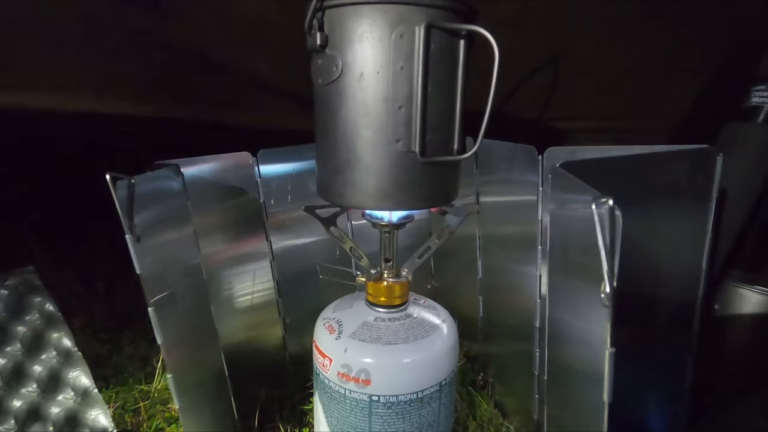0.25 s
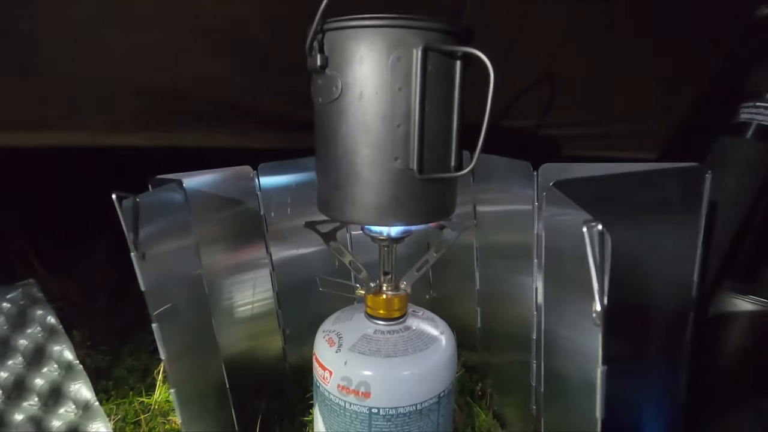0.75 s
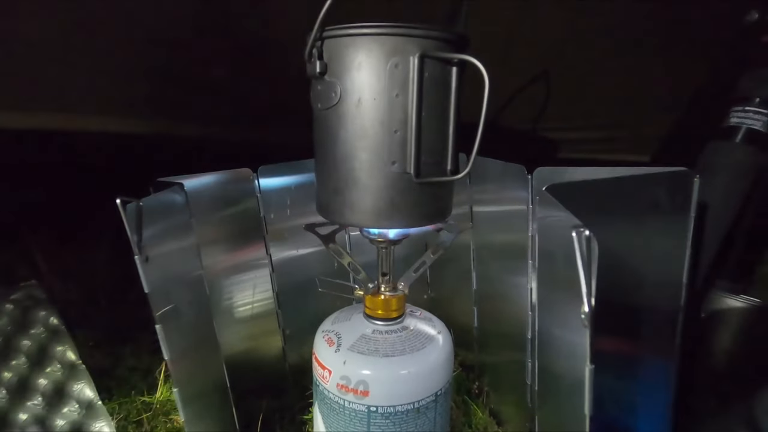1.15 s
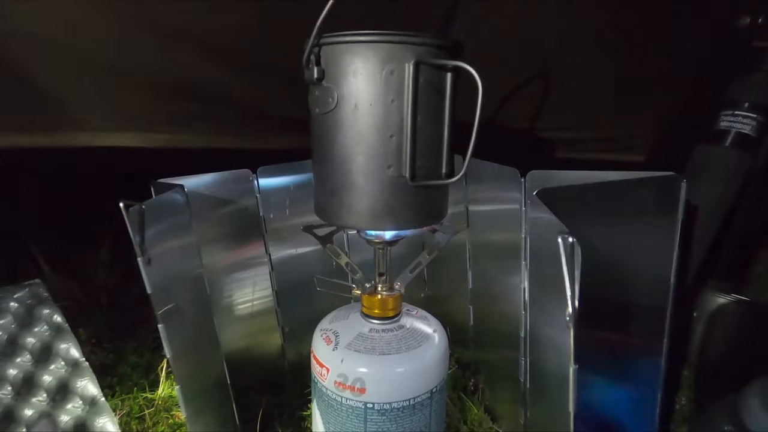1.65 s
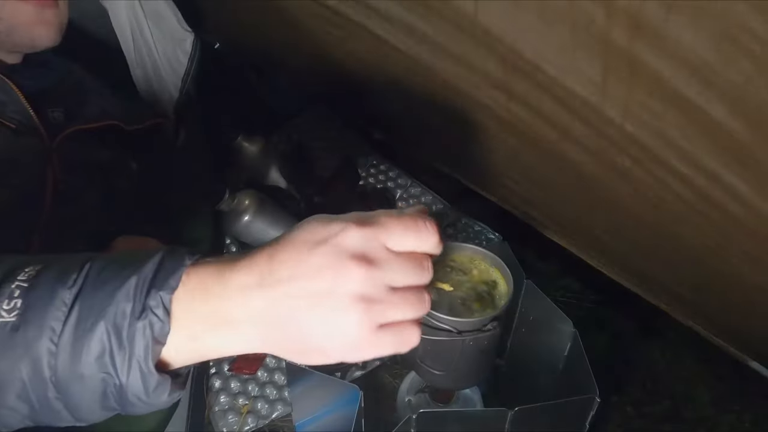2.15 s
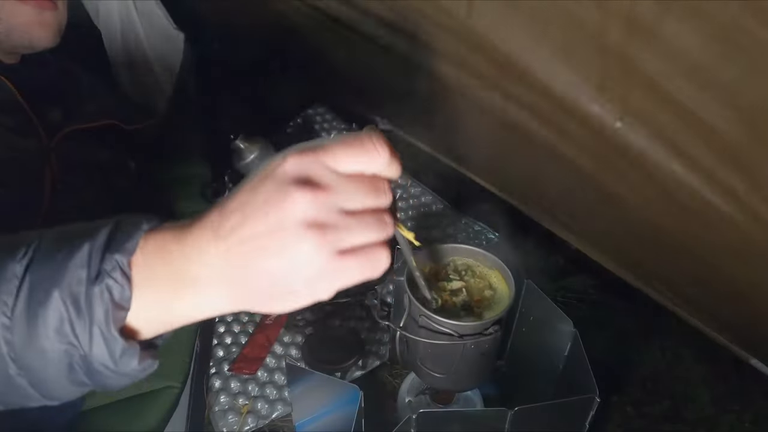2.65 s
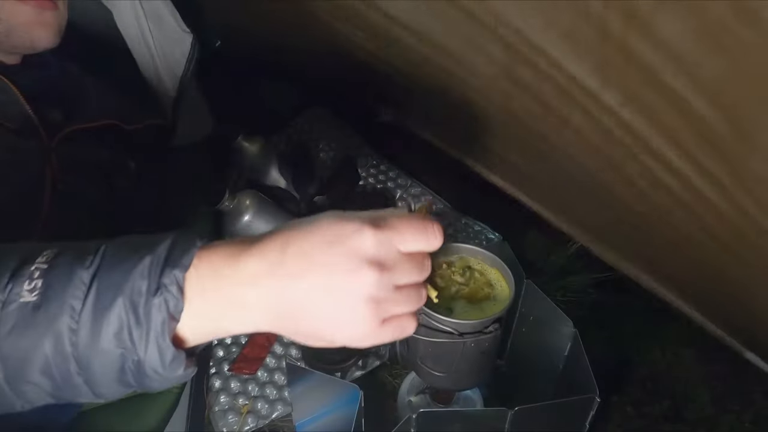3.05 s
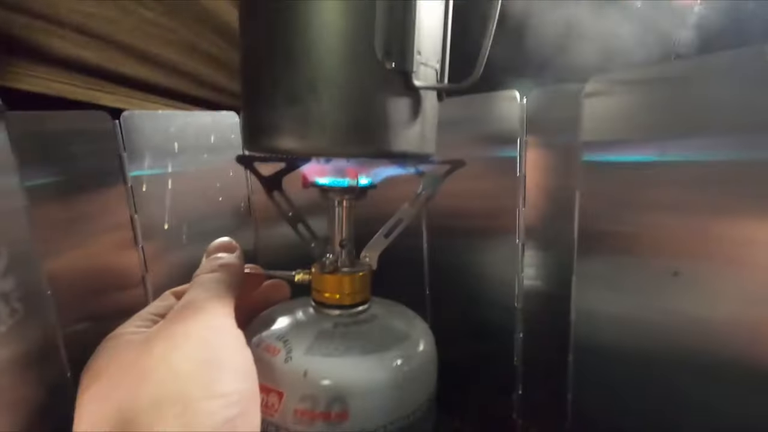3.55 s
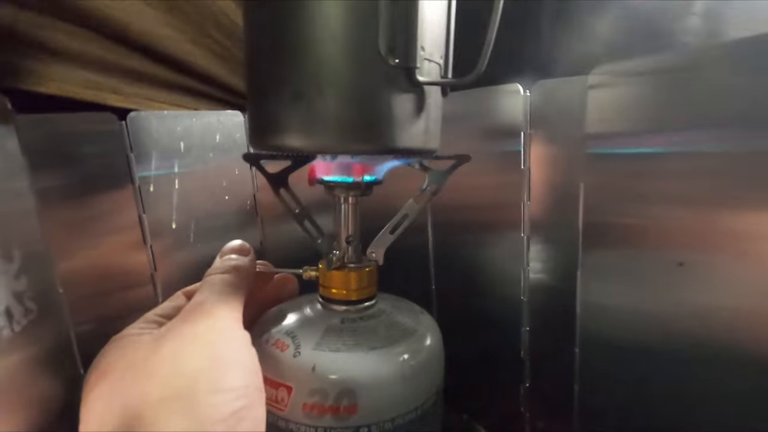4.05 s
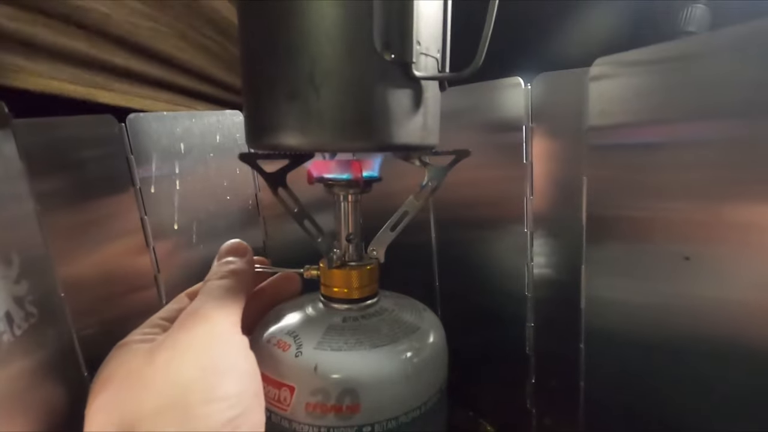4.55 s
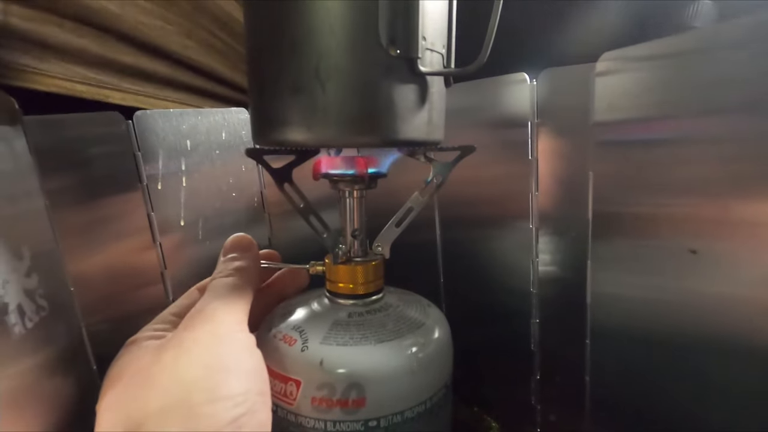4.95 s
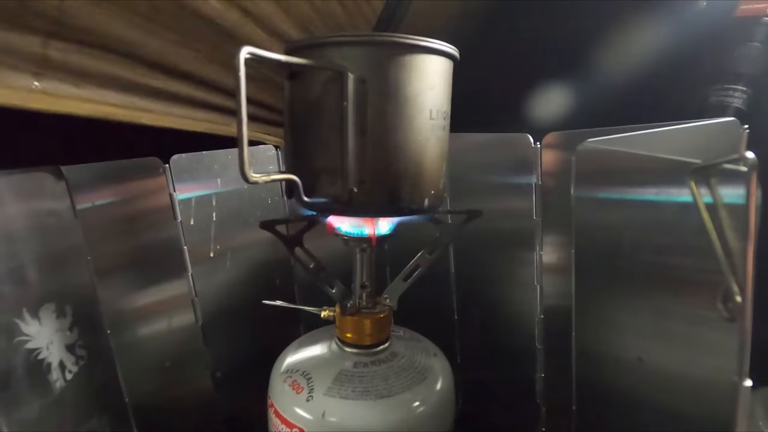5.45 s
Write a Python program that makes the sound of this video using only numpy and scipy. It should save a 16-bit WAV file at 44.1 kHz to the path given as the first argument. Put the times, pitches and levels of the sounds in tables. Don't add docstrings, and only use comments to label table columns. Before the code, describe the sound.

From 0 to 2.0 s a small canister stove burns close by: a steady breathy roar with a bright, airy jet hiss, fluttering lightly, its metallic colour sliding slightly as the microphone moves. At 2.0 s it cuts to above the pot: the flame is somewhat quieter and darker, with more low rumble and wavering hiss; a tiny high creak comes near 3.3 s. Two dull, deep thumps almost together at 3.41-3.43 s mark the next cut. Now close to the burner, the flame is softer and rounded stew bubbles plop rapidly. From 3.6 to 4.3 s the gas is turned down, the roar and thin whistle sinking away. Until 5.4 s, muffled irregular pops, fine spatter, dry foil ticks and faint valve nudges stand over a very low flame. At about 5.46 s a fuller flame roar returns abruptly, with a small sharp tick near 5.56 s, and continues to the end.

```python
import sys
import numpy as np
from scipy import signal
from scipy.fft import rfft, irfft, next_fast_len
from scipy.io import wavfile
from scipy.ndimage import uniform_filter1d, map_coordinates

SR = 44100
rng = np.random.default_rng(int(sys.argv[2]) if len(sys.argv) > 2 else 0)


def materialize(psi):
    bounded = np.clip(np.atleast_2d(psi).T, -1, 1)
    quanta = np.round(bounded * 32767).astype(np.int16)
    wavfile.write(sys.argv[1], SR, quanta)


def field_ratio(decibels):
    return 10 ** (np.asarray(decibels, dtype=float) / 20)


N = 250929

# start_s, end_s
PLACES_S = [
    (0, 2.020),
    (2.020, 3.486),
    (3.486, 5.457),
    (5.457, 5.69),
]
# rumble_db, roar_db, rush_db, jet_under_pot_db, jet_off_foil_db, fizz_db
LEVELS_DB = [
    (-40, -28.5, -32.5, -44.5, -43, -48),
    (-34, -33, -37.5, -47.5, -51.5, -54),
    (-46.5, -38, -52, -69, -75, -70.5),
    (-39.5, -34.5, -43.5, -66, -68, -58),
]
# freq_hz, density_db_per_hz
FLAME_BESIDE = [(11, -47), (18, -9), (37, -18), (81, -1.5), (119, -0.5), (164, -2), (348, -10.5),
                (482, -11), (579, -18.5), (695, -14), (868, -18.5), (1110, -15.5), (1730, -12), (1960, -22),
                (2300, -23.5), (2990, -60), (5060, -120)]
FLAME_ABOVE = [(11, -30), (18, 4), (32, 4), (60, -3), (161, -7), (348, -23), (463, -16.5), (654, -11.5),
               (817, -18), (923, -25), (1200, -21.5), (1530, -36), (1800, -35.5), (2300, -36), (2990, -64),
               (5060, -120)]
FLAME_LOW = [(11, -32), (18, -11.5), (60, -5), (178, 4.5), (300, -3.5), (454, -11.5), (579, -37),
             (723, -11.5), (834, -18), (1110, -17), (1700, -23.5), (2300, -38), (2990, -71), (5060, -120)]
FLAME_REOPENED = [(11, -30), (18, 6), (86, -5.5), (146, -7.5), (348, -10.5), (579, -18), (738, -15.5),
                  (1040, -30.5), (1360, -25), (2300, -38), (2990, -67), (5060, -120)]
# freq_hz, density_db_per_hz
JET_BESIDE = [(1240, -34), (2100, -9), (2360, -5.5), (2620, 0.5), (2940, 0), (3290, 0.5), (4390, -7),
              (4720, -8), (5210, -10.5), (5800, -9), (6340, -15), (8590, -17), (12000, -28.5), (14900, -41)]
JET_ABOVE = [(1240, -39), (2100, 2.5), (2390, -7), (2710, 3), (3060, -0.5), (3210, -4), (3600, -2.5),
             (4350, -10), (4720, -9.5), (5300, -11), (5750, -13), (5990, -14), (8590, -23.5), (12800, -35),
             (14900, -44)]
JET_LOW = [(1240, -30), (2100, -2), (2260, -13), (2770, -11), (3600, -12.5), (4530, -10.5), (5890, -11),
           (6880, -18), (7590, -13), (14900, -37.5)]
JET_REOPENED = [(1240, -30), (2100, -5), (2410, -3), (2600, -3), (3580, -6), (4180, -4), (5210, -10),
                (5840, -2.5), (7720, -17), (9090, -13), (9550, -17), (12900, -23), (14900, -36)]
# freq_hz, width_hz, lift_db
RESONANCES = [
    [(720, 400, 2.5), (1787, 100, 3.5), (2697, 130, 4.5), (2980, 60, -12.5), (3270, 82, 3.5), (4130, 69, 1),
     (4740, 90, 6.5), (5150, 70, 1), (5760, 95, 3), (6800, 97, 1), (7840, 100, -3), (8440, 62, -3),
     (11620, 60, 5), (12650, 90, 4)],
    [(635, 180, -1), (2668, 92, 6.5), (3380, 360, 4), (4600, 110, 7.5), (5660, 81, 8.5), (6500, 91, 5),
     (7740, 170, 2.5), (8500, 120, 7)],
    [(684, 52, 4), (2780, 300, 4.5), (7810, 310, 0)],
    [(5800, 350, 8.5), (9000, 300, 4)],
]
# freq_hz, likeness_0_to_1, left_minus_right_db, left_lag_us
PORTS = [
    [(40, 1, 2.5, 60), (300, 0.97, 0.5, 115), (700, 0.94, -1.5, 28), (1690, 1, 1.5, 42),
     (2270, 0.34, 6, 58), (2680, 0.82, 3, 35), (4000, 0.8, 2, 31), (5600, 0.5, 2.5, 16), (6600, 0, 0.5, 31),
     (9400, 0.4, -1, 22), (14000, 0.1, -.5, 84)],
    [(40, .985, 2.5, 60), (300, 0.97, 0.5, 105), (1190, 0.97, -2.4, 50), (1600, 0.7, 1.5, 43),
     (2700, 0.98, 1, 53), (3800, 0.8, 0, 31), (4900, 0.8, 4.1, 36), (6200, 0.4, -3, 39), (7600, 0.2, 3, 34),
     (9400, 0.3, -1, 30), (14000, 0.2, -1, 51)],
    [(40, 1, -0.13, 3), (1490, 1, -0.58, 1.5), (2500, 0.98, 1, 3), (3900, 0.95, 1.5, 3),
     (5800, 0.98, 0.5, 3), (7000, 0.9, .2, 2.7), (10600, 0.87, -.3, .1), (11700, .32, -2, 5)],
]
# time_s, pitch_hz
SWAY = [
    (0, 3310),
    (.3, 3296),
    (.55, 3200),
    (.8, 3276),
    (1.0, 3302),
    (1.25, 3190),
    (1.45, 3300),
    (1.65, 3530),
    (1.85, 3330),
    (2.02, 3310),
]
# centre_s, width_s, freq_hz, lift_db
SHADES = [(2.23, .05, 480, 6), (2.2, 0.11, 640, -3), (2, 0.094, 640, 10), (2.91, 0.1, 840, 14),
          (4.4, 0.092, 2800, -8), (2.72, 0.12, 2300, 3.5), (2.71, .09, 5000, 4), (2.1, 0.061, 4700, -1),
          (3.36, 0.21, 3200, 10), (3.24, 0.16, 4700, -3), (3.7, .15, 5100, 1.5), (2.53, 0.24, 5900, -4),
          (0.17, 0.063, 1800, 3.5), (1.04, 0.13, 2500, 2), (1.3, 0.07, 9200, -1), (1.7, 0.12, 2800, 2.5),
          (3.66, 0.083, 3000, 7), (3.8, .25, 12300, 7), (0.081, 0.18, 5300, 3), (1.34, 0.19, 4400, 1.5),
          (2.28, .1, 3900, 6), (3.35, .03, 1300, 3), (3.32, 0.15, 3200, -6), (2.46, .2, 3400, -2.5),
          (1.7, .06, 5500, 2), (1.75, 0.13, 140, 3)]
# centre_s, width_s, lift_db
DRAUGHT = [
    (3.409, 0.062, 4.5),
    (4.62, 0.14, -7.5),
]
# time_s, flow_db
GAS = [
    (3.495, 0.5),
    (3.72, -4.5),
    (3.9, -3.5),
    (4.04, -4.5),
    (4.1, -9.5),
    (4.27, -13),
    (4.8, -14),
    (5.45, -12.5),
]
FOLLOWS_GAS = (0.08, 1.66, 0.8, 0.76, 0.73, 0.7)
# start_s, peak_db, pitch_hz
CREAKS = [(3.278, -44, 5250), (3.6144, -65.5, 4470), (3.7324, -55, 5530), (3.7773, -67, 5840),
          (3.8434, -60, 6030), (3.8626, -55, 8580), (3.9637, -54, 5540), (3.9645, -58, 12000),
          (3.9804, -69, 4600), (4.0138, -62, 4520), (4.1754, -64, 5950), (4.2807, -64, 4500),
          (4.3031, -66, 5800), (4.3634, -63, 5260), (4.4418, -53, 5350), (4.4524, -63, 5300),
          (4.62, -55, 5900), (4.6274, -57, 5110), (4.7356, -63, 4910), (4.8554, -61, 5840),
          (4.8604, -60, 5020), (4.8854, -61, 5210), (4.8923, -60, 4490), (5.1033, -60, 5200),
          (5.1248, -60, 4670), (5.2614, -63, 4500), (5.2824, -57, 4780), (5.3497, -60, 4550),
          (5.4453, -54, 5660), (5.5563, -44.5, 5760)]
# start_s, peak_db, pitch_hz
TICKS = [(3.6151, -50, 2780), (3.7767, -55, 2930), (3.963, -71, 2600), (4.0067, -55, 2580),
         (4.0506, -67, 2720), (4.4417, -54, 2300), (4.6053, -64, 3020), (4.8064, -66, 2790),
         (4.8548, -53, 2510), (4.856, -63, 3500), (4.8856, -72, 9500), (5.1082, -56.5, 3080),
         (5.1281, -55, 2250), (5.2159, -65, 2790), (5.2608, -68, 4280), (5.4599, -64, 2370),
         (5.557, -46, 2950)]
# start_s, peak_db, pitch_hz
SPARKS = [(4.067, -62, 7810), (4.3534, -67, 7640), (4.4412, -70, 8220), (4.6193, -64, 8500),
          (4.8562, -70, 8300), (4.8852, -68, 9160), (5.1241, -62, 8000), (5.277, -68, 8000),
          (5.277, -76, 12500), (5.34, -70, 7500), (4.03, -68, 8000)]
# start_s, peak_db, pitch_hz
KNOCKS = [(3.412, -20, 47.5), (3.43, -18, 54.5), (4.204, -36.5, 44), (4.495, -37, 211), (4.765, -39, 269),
          (4.979, -44, 300), (5.112, -54, 290), (4.807, -33, 300), (4.876, -30.5, 264), (5.124, -34, 80),
          (5.271, -38.5, 89), (5.325, -34, 260)]
# time_s, level_db
BOIL = [
    (3.495, -45),
    (3.9, -48.5),
    (4.1, -49),
    (4.3, -61),
    (4.55, -59.5),
    (4.8, -53.5),
    (5.15, -54.5),
    (5.38, -73),
    (5.455, -36.5),
]
# start_s, peak_db, pitch_hz, snap_minus_peak_db
POPS = [(3.652, -26, 891, -24), (3.681, -23, 663, -28), (3.738, -34, 732, -15), (3.82, -30, 678, -23),
        (3.85, -31, 635, -22), (3.899, -27.5, 630, -23), (3.921, -27, 620, -6), (3.953, -31, 750, -13),
        (3.981, -38, 780, -15), (4.006, -30, 450, -7), (4.085, -36, 680, -16), (4.193, -31, 715, -11),
        (4.355, -48, 684, 6.5), (4.467, -35.5, 670, -7), (4.497, -36.5, 680, -14), (4.559, -42.5, 902, -1),
        (4.698, -38, 724, -16), (4.719, -40, 643, -11), (4.805, -37, 640, -27), (4.856, -30, 457, -5),
        (4.876, -32, 616, -25), (4.939, -38, 719, -3), (4.979, -31.5, 681, -25), (5.033, -36, 686, -9),
        (5.105, -32, 720, -16), (5.22, -34, 750, -10), (5.308, -36, 692, -20), (5.402, -36.5, 760, -7),
        (5.418, -35, 654, -7), (5.431, -34, 770, -14)]
# start_s, peak_db
SMALL_POPS = [(3.537, -48), (3.579, -33), (3.749, -47), (3.776, -32.5), (3.812, -34), (3.87, -37),
              (3.907, -30), (4.054, -60), (4.146, -40), (4.295, -36.5), (4.332, -38.5), (4.441, -56),
              (4.627, -40), (4.64, -39), (4.649, -40), (4.912, -53), (4.961, -33), (5.21, -53),
              (5.256, -48), (5.27, -46), (5.284, -44), (5.32, -35), (5.338, -40), (5.385, -44),
              (5.452, -34), (3.659, -35), (3.689, -34), (3.757, -37), (4.015, -40), (4.451, -47),
              (4.473, -44), (4.601, -42), (4.671, -48), (4.893, -44), (4.947, -42)]

SMALL_POP_HZ, SMALL_POP_SNAP_DB = 695, -11.5
POT_HZ, POT_T60_S, POT_DB = 725, 0.045, -21
WHISTLE_HZ, WHISTLE_WIDTH_HZ, WHISTLE_DB, WHISTLE_FOLLOWS_GAS = 5870, 470, -67.5, 1.9
SWAY_REST_HZ = 3270
SLIDE_SHARE = 0.022
SHADE_OCTAVES = 0.27
LEAN_DB_PER_S = -0.5


def read(table, hz, column=1):
    table = np.transpose(table)
    return np.interp(np.log(hz), np.log(table[0]), table[column])


def walk(rate_hz, size):
    hold = int(SR / rate_hz)
    steps = np.repeat(rng.standard_normal(N // 400)[:size // hold + 1], hold)
    return 1.2 * uniform_filter1d(uniform_filter1d(steps, hold), hold)[:size]


def add(out, at_s, sound):
    i = int(at_s * SR)
    out[i:i + len(sound)] += sound[:N - i]


def blip(hz, cycles):
    turns = np.arange(int(9 * cycles * SR / hz) + 8) * hz / SR
    ring = -np.sin(2 * np.pi * turns) * turns * np.exp(-turns / cycles)
    return ring / np.max(np.abs(ring))


def ports(hz, shared, apart, place):
    table = PORTS[min(place, 2)]
    like = np.clip(read(table, hz, column=1), 0, 1)
    left_db, lag_us = read(table, hz, column=2), read(table, hz, column=3)
    mid = shared * np.sqrt((1 + like) / 2)
    side = apart * np.sqrt((1 - like) / 2)
    tilt = field_ratio(left_db / 2) * np.exp(-1j * np.pi * hz * lag_us / 10 ** 6)
    return np.array([(mid + side) * tilt, (mid - side) / tilt])


def valve_db(t):
    return np.interp(t, *np.transpose(GAS))


def turbulence(t, place, colour, edges_hz, levels_db, step_octaves, gust_db, flicker_db, drift_db):
    size = levels_db.shape[1]
    hz = np.maximum(np.arange(size // 2 + 1) * SR / size, 1.)
    lift_db = sum(db / (1 + (2 * (hz - f) / w) ** 2) for f, w, db in RESONANCES[place])
    gain = field_ratio(read(colour, hz) + lift_db) * (hz > edges_hz[0]) * (hz < edges_hz[-1])
    eddies = ports(hz, *rfft(rng.standard_normal((2, size))), place) * gain

    power = np.abs(eddies.mean(axis=0)) ** 2 * 2 / size ** 2
    zones = list(zip(edges_hz[:-1], edges_hz[1:]))
    have_db = np.array([10 * np.log10(power[(hz > a) & (hz <= b)].sum()) for a, b in zones])
    middles = np.log2([np.sqrt(a * b) for a, b in zones])

    if place == 0:
        slip = np.cumsum(np.interp(t, *np.transpose(SWAY)) / SWAY_REST_HZ)
    else:
        slip = np.arange(size) + np.cumsum(SLIDE_SHARE * walk(2.5, size))
    slide_low_hz, slide_high_hz = (2900, 4000) if place == 0 else (3300, 5600)

    gust = walk(24.07, size) + 1.22 * walk(69.8, size)
    flicker = walk(8.4, size)
    octave, out = np.log2(hz), 0
    low, high = np.log2(edges_hz[0]), np.log2(edges_hz[-1])
    for centre in np.arange(low, high + step_octaves, step_octaves):
        share = np.clip(1 - np.abs(octave - centre) / step_octaves, 0, 1)
        zone_at = np.interp(centre, middles, np.arange(len(zones)))
        weights = np.clip(1 - np.abs(np.arange(len(zones)) - zone_at), 0, 1)
        flicker = 0.27 * flicker + 1.64 * walk(15.16, size)
        band_db = weights @ (levels_db - have_db[:, None]) + gust_db * gust + flicker_db * flicker
        band_db += drift_db * walk(3.25, size)
        for at_s, width_s, f, db in SHADES:
            away = centre - np.log2(f)
            if t[0] < at_s < t[-1] and abs(away) < 0.6:
                band_db += db * np.exp(-((t - at_s) / width_s) ** 2 - (away / SHADE_OCTAVES) ** 2)
        band = irfft(eddies * share, size)
        if place < 2 and slide_low_hz < 2 ** centre < slide_high_hz:
            band = np.array([map_coordinates(port, [slip], order=3, mode="wrap") for port in band])
        out = out + field_ratio(band_db) * band
    return out


def stove():
    flames = FLAME_BESIDE, FLAME_ABOVE, FLAME_LOW, FLAME_REOPENED
    jets = JET_BESIDE, JET_ABOVE, JET_LOW, JET_REOPENED
    flame_unrest = [(0.78, 0.48, 0.11), (0.5, 0.75, 0.3), (1.2, 0.9, 0.11), (0.89, 0.74, 0.1)]
    jet_unrest = [(0.5, 0.7, 0.7), (0.5, 0.6, 0.35), (0.5, 0.6, 0.6), (0.6, 0.6, 0.6)]
    flame_edges_hz, jet_edges_hz = (18, 70, 400, 2200), (2200, 3100, 4300, 15200)
    melt_samples = 160
    out = np.zeros((2, N))
    for place, levels_db in enumerate(LEVELS_DB):
        first, last = (min(int(s * SR), N) for s in PLACES_S[place])
        size = next_fast_len(last - first + 200, True) // 2 * 2
        t = np.arange(first, first + size) / SR
        db = np.array(levels_db)[:, None] + np.outer(FOLLOWS_GAS, valve_db(t) * (place == 2))
        if place == 1:
            db[4] += LEAN_DB_PER_S * (t - t.mean())
        for at_s, width_s, lift_db in DRAUGHT:
            db[0] += lift_db * np.exp(-((t - at_s) / width_s) ** 2)
        flame = turbulence(t, place, flames[place], flame_edges_hz, db[:3], 0.5, *flame_unrest[place])
        jet = turbulence(t, place, jets[place], jet_edges_hz, db[3:], 0.22, *jet_unrest[place])
        since = np.arange(size) / melt_samples
        until = (last - first) / melt_samples + 1 - since
        melt = np.clip(np.minimum(since + (place == 0), until), 0, 1)
        out[:, first:first + size] += ((flame + jet) * np.sin(melt * np.pi / 2))[:, :N - first]
    return out


def ticks(table, cycles, grit_db, grit_s):
    out, t = np.zeros(N), np.arange(500) / SR
    for (at_s, db, hz), grit in zip(table, rng.standard_normal((len(table), 500))):
        tail = np.convolve(grit * np.exp(-t / grit_s), blip(hz, cycles / 2))
        add(out, at_s, field_ratio(db) * blip(hz, cycles))
        add(out, at_s, field_ratio(db + grit_db) * tail)
    return out


def knocks():
    out = np.zeros(N)
    for at_s, db, hz in KNOCKS:
        add(out, at_s, field_ratio(db) * blip(hz, 0.37 if hz < 150 else 0.16))
    return out


def whistle():
    edges_hz = WHISTLE_HZ + np.array([-0.5, 0.5]) * WHISTLE_WIDTH_HZ
    band = signal.butter(2, edges_hz, "band", fs=SR, output="sos")
    gas = signal.sosfilt(band, rng.standard_normal(N))
    t = np.arange(N) / SR
    low_flame = (t > PLACES_S[2][0]) & (t < PLACES_S[2][1])
    level_db = WHISTLE_DB + WHISTLE_FOLLOWS_GAS * valve_db(t) + 1.1 * walk(29.6, N)
    return low_flame * gas / gas.std() * field_ratio(level_db)


def bubble_bursts(out):
    bursts = list(POPS) + [(s, db, SMALL_POP_HZ, SMALL_POP_SNAP_DB) for s, db in SMALL_POPS]
    for (at_s, db, hz, snap_db), chance in zip(bursts, rng.random((len(bursts), 7))):
        snap = blip(1150 + 500 * chance[1], 0.3 + 0.3 * chance[2])
        add(out, at_s, field_ratio(db - 7.5) * blip(hz, 0.14 + 0.5 * chance[0]))
        add(out, at_s, field_ratio(db - 9) * blip(284, 0.31))
        add(out, at_s, field_ratio(db + snap_db + 3.5) * snap)
        for late, pitch in chance[1:].reshape(3, 2):
            drop = blip(550 * 2.8 ** pitch, 0.44)
            add(out, at_s + 0.001 + 0.009 * late, field_ratio(db - 8.5 - 3.5 * late) * drop)


def bubble_patter(out, rate_hz=230, small_db=2, scatter_db=2.5):
    start_s, end_s = PLACES_S[2]
    curve, flurry = np.transpose(BOIL), walk(45, N)
    chance = rng.random((1200, 3))
    times_s = start_s - np.cumsum(np.log(chance[:, 0])) / rate_hz
    for at_s, pitch, size in zip(times_s, chance[:, 1], chance[:, 2]):
        if at_s < end_s:
            boil_db = np.interp(at_s, *curve) + 2.8 * flurry[int(at_s * SR)]
            db = small_db + boil_db + scatter_db * (-np.log(size) - 1)
            add(out, at_s, field_ratio(db) * blip(480 * 3.7 ** pitch, 0.4))


def simmer(stew_top_hz=1780):
    out = np.zeros(N)
    bubble_bursts(out)
    bubble_patter(out)
    t = np.arange(3000) / SR
    pot = np.sin(2 * np.pi * POT_HZ * t) * 1000. ** (-t / POT_T60_S) * 2 * np.pi * POT_HZ / SR
    out = out + field_ratio(POT_DB) * signal.fftconvolve(out, pot)[:N]
    return signal.sosfilt(signal.butter(6, stew_top_hz, fs=SR, output="sos"), out)


def scene():
    burner = stove()
    foil = ticks(CREAKS, 1.44, -11, 0.0023)
    spatter = ticks(TICKS, 0.85, -11.5, 0.0046) + ticks(SPARKS, 1.5, -11, 0.002)
    small = rfft(foil + knocks() + whistle() + simmer() + spatter)
    hz = np.maximum(np.arange(len(small)) * SR / N, 1.)
    late = small * np.exp(-2j * np.pi * hz * 0.00129)
    return burner + irfft(ports(hz, small, late, 2), N)


def thin_treble(x, from_hz=7000, rise_db_per_octave=14, swing_db=3.6):
    hz, t, lines = signal.stft(x, SR, "cosine", nperseg=2048)
    power = np.abs(lines) ** 2
    around = uniform_filter1d(power, size=33, axis=1) + 1e-18
    swing = rng.standard_normal((len(hz) // 32 + 1, power.shape[2]))
    by_band = np.repeat(swing, 32, axis=0)[:len(hz)]
    swing = 1.6 * uniform_filter1d(swing[0] + 0.7 * by_band, size=3, axis=1)
    octaves = np.log2(np.maximum(hz, 1) / from_hz)[:, None]
    bar_db = np.minimum(-12 + rise_db_per_octave * octaves + swing_db * swing, 3.5)
    kept = (power > around * field_ratio(2 * bar_db)) | (hz < from_hz)[:, None] | (t > PLACES_S[2][0])
    share = np.maximum(uniform_filter1d(power * kept, size=33, axis=1) / around, 0.4)
    return signal.istft(lines * kept / np.sqrt(share), SR, "cosine", nperseg=2048)[1][:, :N]


def low_pass(x):
    return signal.sosfilt(signal.butter(12, 15010, fs=SR, output="sos"), x)


def record(dry):
    mix = thin_treble(dry)
    return low_pass(mix)


dry = scene()
out = record(dry)
materialize(out)
```